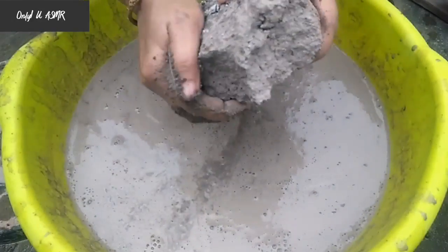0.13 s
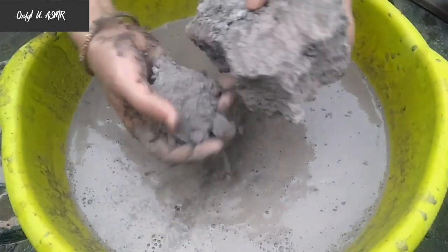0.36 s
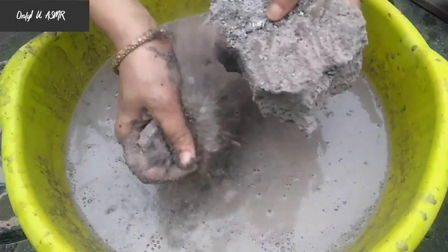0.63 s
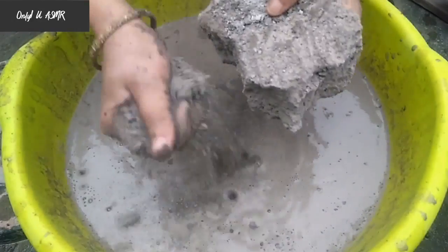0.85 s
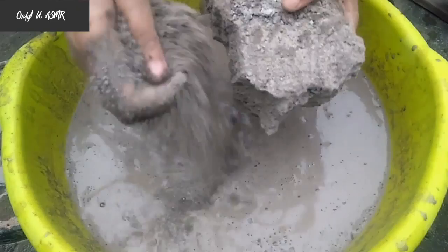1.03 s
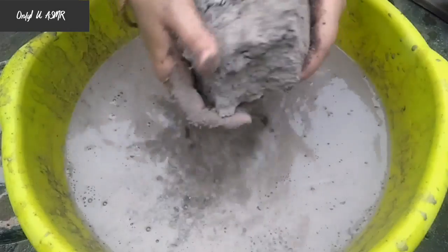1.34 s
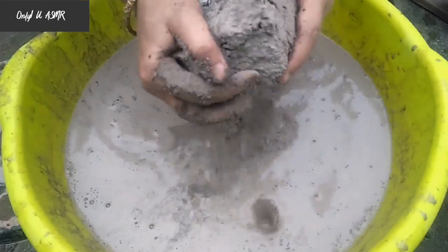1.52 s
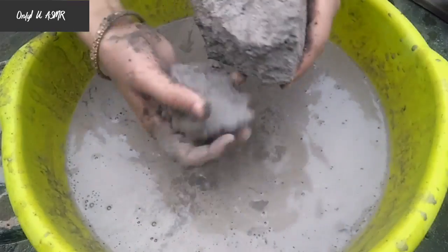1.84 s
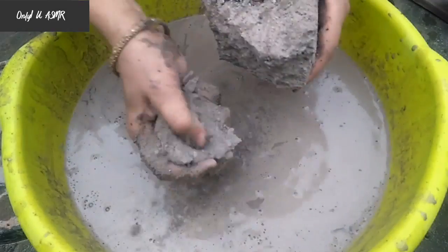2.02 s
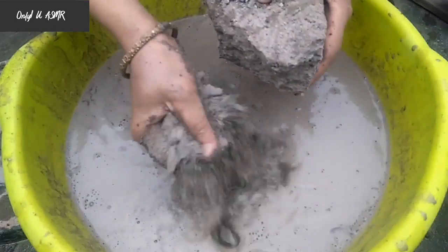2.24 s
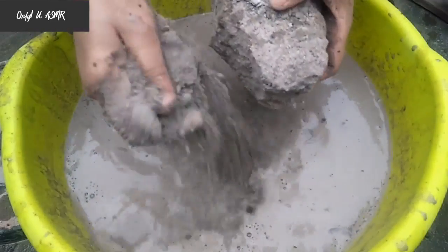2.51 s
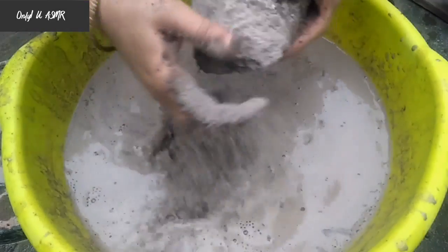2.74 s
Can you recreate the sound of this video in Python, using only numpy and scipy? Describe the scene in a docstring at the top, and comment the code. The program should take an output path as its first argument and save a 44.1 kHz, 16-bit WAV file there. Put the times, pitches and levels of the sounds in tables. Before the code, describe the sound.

Sandy lumps crumble into a plastic tub of water, heard close, outdoors. Low uneven rumble and a very faint far tone open; soft crunches and small plops come by 0.5 s. Plops, tub knocks and grit patter cluster at 0.9-1.5 s, with the loudest hollow plop at 1.55. After a quiet lull with light crunches and tiny bubble tones, a bright plop snaps at 2.44, then a splashy cluster at 2.82.

```python
"""A low, uneven town rumble under faint broad noise is heard first, out of doors; a faint far tone,
perhaps a horn, soon sounds as a gliding sine. Hands crumble a lump of gritty sand over a plastic tub of
muddy water: coloured random ticks make the crunches and the patter of grit. Crumbs plop and drip as
decaying resonances, some knocking the tub, dry grains snap as short bright noise bursts, and trapped
air rings as gliding sines."""
import sys
import numpy as np
from scipy import signal
from scipy.fft import rfft, irfft, next_fast_len
from scipy.io import wavfile

SR = 44100
rng = np.random.default_rng(int(sys.argv[2]) if len(sys.argv) > 2 else 0)


def to_wav(s):
    """Save 16-bit WAV."""
    ch = np.atleast_2d(s).T  # columns
    pcm = np.round(np.clip(ch, -1, 1) * 32767)  # PCM
    wavfile.write(sys.argv[1], SR, pcm.astype(np.int16))


N = 127008  # samples


def amp(db):
    """Decibel law: a level as an amplitude ratio."""
    return 10 ** (np.asarray(db) / 20)


def rms_one(x):
    """Normalisation to unit root-mean-square."""
    return x / np.sqrt(np.mean(x ** 2) + 1e-20)


def in_time(rows):
    """Linear interpolation of each column over the whole time axis."""
    s, *columns = np.transpose(rows)
    return [np.interp(np.arange(N) / SR, s, column) for column in columns]


def low_pass(x, hz):
    """Second-order Butterworth low-pass filtering."""
    return signal.sosfilt(signal.butter(2, hz, fs=SR, output="sos"), x)


def resonance(x, hz, width_hz):
    """Damped resonance: a two-pole filter whose bandwidth sets its decay."""
    r = np.exp(-np.pi * width_hz / SR)
    zeros = [(1 - r * r) / 2, 0, (r * r - 1) / 2]
    poles = [1, -2 * r * np.cos(2 * np.pi * hz / SR), r * r]
    return signal.lfilter(zeros, poles, x + 1e-18)


def colour(x, points):
    """Minimum-phase filtering: a drawn spectrum is imposed and nothing sounds early."""
    hz, db = np.transpose(points)
    size = next_fast_len(N + 4096)
    bins = np.fft.rfftfreq(size, 1 / SR) + 1
    log_magnitude = np.interp(np.log(bins), np.log(hz), db) * np.log(10) / 20
    # Folding the cepstrum onto positive times gives the minimum phase.
    cepstrum = irfft(log_magnitude, size)
    cepstrum[1:size // 2] *= 2
    cepstrum[size // 2 + 1:] = 0
    return irfft(rfft(x, size) * np.exp(rfft(cepstrum)), size)[:N]


def drift(rate_hz):
    """Twice low-passed noise: slow random variation of unit rms."""
    r = np.exp(-2 * np.pi * rate_hz / SR)
    settled = signal.lfilter([1], [1, -2 * r, r * r], rng.standard_normal(N + SR))[SR:]
    return rms_one(settled)


def hump(start, length):
    """Amplitude envelope: one soft rise and fall, the square root of a half sine."""
    progress = np.clip((np.arange(N) / SR - start) / length, 0, 1)
    return np.sqrt(np.sin(np.pi * progress))


def grains(rate, spread_db, points):
    """Random impulse process: uneven ticks of either sign, scaled to unit rms once coloured."""
    sizes = amp(spread_db * np.minimum(rng.exponential(1, N), 5)) * rng.choice([-1, 1], N)
    ticks = sizes * (rng.random(N) < rate / SR)
    return ticks / np.std(colour(ticks, points))


# The lump crunches, or a shower of grit lands: [t/s, length/s, level/dB]
CRUNCHES = [(0.126, 0.046, -62), (0.333, 0.021, -50.5), (0.374, 0.024, -51.5), (0.649, 0.029, -51),
            (0.689, 0.026, -53), (0.78, 0.029, -48.5), (1.027, 0.013, -42), (1.072, 0.0064, -42),
            (1.2035, 0.0051, -44), (1.22, 0.026, -51), (1.261, 0.05, -45.5), (1.356, 0.0098, -53),
            (1.411, 0.0063, -52), (1.718, 0.0063, -47), (1.811, 0.03, -53.5), (2.101, 0.013, -47.5),
            (2.197, 0.026, -47.5), (2.29, 0.01, -46), (2.365, 0.021, -50), (2.549, 0.032, -52.5),
            (2.678, 0.047, -51), (2.82, 0.012, -41), (2.844, 0.01, -45)]
# Spectrum of a grain tick, also used by grit(): [f/Hz, level/dB per Hz]
GRAIN_COLOUR = [(760, -48.5), (1300, -4.5), (2430, 4.5), (3730, 0.5), (4530, 1.5), (6890, -2.5), (9560, 1),
                (15000, -17)]
CRUNCH_TICKS_PER_S, CRUNCH_SPREAD_DB = 3500, 3.0
CRUNCH_TAIL_S = 0.0019  # time constant


def crunches():
    """Gated granular noise: short dense runs of ticks, each with a small exponential tail."""
    r = np.exp(-1 / (CRUNCH_TAIL_S * SR))
    t = np.arange(N) / SR
    gate = np.zeros(N)
    for s, length, db in CRUNCHES:
        gate += amp(db) * np.clip((t - s) / .002, 0, 1) * (t < s + length)  # 2 ms onset
    gate = np.maximum(gate, signal.lfilter([1 - r], [1, -r], gate))
    ticks = grains(CRUNCH_TICKS_PER_S, CRUNCH_SPREAD_DB, GRAIN_COLOUR)
    return colour(gate * ticks, GRAIN_COLOUR)


# Crumbs plop into the water: [t/s, peak level of the tone/dB, f/Hz, cycles to ring down 60 dB]
PLOPS = [(0.3814, -39, 2237, 120), (0.475, -30.5, 2030, 9.6), (0.8674, -43, 1300, 51),
         (0.9459, -21.5, 705, 14.4), (.9490, -24.5, 1010, 10.3), (0.968, -30.5, 2100, 18),
         (0.9800, -29.5, 1320, 20), (.9815, -25.5, 2600, 5.4), (1.0162, -28.5, 3090, 20),
         (1.0274, -34.5, 1233, 52), (1.0757, -32, 1610, 12.6), (1.1134, -36.5, 2930, 10),
         (1.267, -32, 1930, 11), (1.294, -37, 2050, 17), (1.311, -30.5, 2340, 16),
         (1.362, -36.5, 3320, 12.0), (1.4066, -47, 1840, 21), (1.447, -43, 910, 24),
         (1.479, -32.5, 2660, 5.7), (1.526, -35.5, 880, 20), (1.5308, -33, 1950, 14),
         (1.5528, -6.5, 1290, 10.7), (1.6052, -33, 2170, 16), (2.2412, -42.5, 2200, 39),
         (2.376, -32.5, 2100, 4.4), (2.4392, -18.5, 2730, 15.3), (2.4837, -35.5, 2580, 7.8),
         (2.5505, -35, 1720, 11), (2.558, -32, 1424, 16), (2.6109, -40, 593, 6.2),
         (2.7023, -34.5, 2620, 11), (2.8195, -23, 2130, 4.6), (2.824, -25, 1310, 21),
         (2.832, -28, 925, 5.9), (2.854, -33, 2310, 5.5)]
# Modes of the tub: [f/Hz, gain on the knock/dB, 60 dB decay time/s]
TUB_MODES = [(664, 3.5, 0.011), (1313, -10, 0.04), (2823, 2.5, 0.0043), (4314, -19.5, 0.048)]
PITCH_RISE_PER_CYCLE = 0.0015  # share of the starting pitch
ATTACK_CYCLES = 2.76  # time constant of the swell
FLUTTER = .33  # rms share by which the cavity's ring flutters
SPRAY_DB, SPRAY_DECAY_S, SPRAY_TOP_HZ = -16, 0.0033, 4400  # level relative to the plop, before decay
KNOCK_DB_PER_OCTAVE = -5  # small, high crumbs hardly knock the tub


def plops():
    """Cavity resonance: each crumb's ring rises in pitch, throws spray and knocks the tub's modes."""
    t = np.arange(SR // 10) / SR
    out, knocks = np.zeros(N + SR), np.zeros(N + SR)
    noises = low_pass(rng.standard_normal((len(PLOPS), len(t))), SPRAY_TOP_HZ)
    for (s, db, hz, ring_cycles), noise in zip(PLOPS, noises):
        c = hz * t  # cycles at the starting pitch
        swell_and_decay = (1 - np.exp(-c / ATTACK_CYCLES)) * amp(-60 * c / ring_cycles)
        tone = swell_and_decay * np.sin(2 * np.pi * c * (1 + PITCH_RISE_PER_CYCLE / 2 * c))
        tone = tone * (1 + FLUTTER * rms_one(low_pass(noise, hz / 4)))
        spray = amp(SPRAY_DB) * rms_one(np.diff(noise, prepend=0))
        spray = spray * np.exp(-t / SPRAY_DECAY_S) * (1 - np.exp(-c))
        knock = amp(db + KNOCK_DB_PER_OCTAVE * np.log2(hz / 1000)) * c * np.exp(-c * 12) * 20
        i = int(s * SR)
        out[i:i + len(t)] += amp(db) * (tone / np.abs(tone).max() + spray)
        knocks[i:i + len(t)] += knock
    for hz, db, t60 in TUB_MODES:
        width = np.log(1000) / np.pi / t60
        out -= amp(db) * resonance(knocks, hz, width) * hz / width
    return out[:N]


# Falling grit, also drives drips(): [t/s, level/dB]
POUR = [(0, -67.5), (.3, -65), (.85, -57), (1.0, -49.5), (1.15, -56.5), (1.4, -51), (1.62, -55),
        (1.78, -66), (2.05, -64), (2.25, -56), (2.65, -56), (2.88, -53)]
GRIT_PER_S, GRIT_SPREAD_DB, GRIT_CLUMP_DB = 5000, 1, 2.0  # clumping is the rms swing of the level


def grit():
    """Modulated granular noise: loose grains patter on the water in clumps."""
    db, = in_time(POUR)
    clumped = amp(db + GRIT_CLUMP_DB * drift(18))
    return colour(clumped * grains(GRIT_PER_S, GRIT_SPREAD_DB, GRAIN_COLOUR), GRAIN_COLOUR)


DRIPS_PER_S, DRIP_SPREAD_DB = 700, 3.5  # rate at full pour, before the flurries vary it
DRIP_DB = -9  # impulse level relative to the pour, before the spread
DRIP_LOW_HZ, DRIP_HIGH_HZ, DRIP_PITCHES = 1900, 6000, 14
DRIP_CYCLES = 11  # cycles for the narrow resonance to fall 60 dB


def drips():
    """Impulse-excited resonance: small crumbs land in random flurries and ring a few cycles each."""
    db, = in_time(POUR)
    sizes = amp(db + DRIP_DB + DRIP_SPREAD_DB * np.minimum(rng.exponential(1, N), 3))
    rate = DRIPS_PER_S * amp(db - db.max() + 4.0 * drift(8))
    impacts = sizes * (rng.random(N) < rate / SR)
    dealt = rng.integers(0, DRIP_PITCHES, N)
    pitches = np.geomspace(DRIP_LOW_HZ, DRIP_HIGH_HZ, DRIP_PITCHES)
    out = np.zeros(N)
    for k, hz in enumerate(pitches):
        width = np.log(1000) / np.pi * hz / DRIP_CYCLES
        ring = resonance(impacts * (dealt == k), hz, width)
        out += resonance(ring, hz, hz / 2) * SR / width  # the second, broad pass softens the onset
    return out


# Dry grains snap brightly: [t/s, noise level before decay and high-pass/dB]
SNAPS = [(1.001, -29.5), (1.531, -27), (1.934, -35), (1.951, -37.5), (2.4401, -23.5)]
SNAP_DECAY_S, SNAP_BOTTOM_HZ = 0.00058, 5000


def snaps():
    """Exponentially decaying noise, high-passed: very short bright bursts."""
    t = np.arange(SR // 50) / SR
    out = np.zeros(N + SR)
    noises = rng.standard_normal((len(SNAPS), len(t)))
    for (s, db), noise in zip(SNAPS, noises):
        i = int(s * SR)
        out[i:i + len(t)] += amp(db) * noise * np.exp(-t / SNAP_DECAY_S)
    high_pass = signal.butter(2, SNAP_BOTTOM_HZ, "high", fs=SR, output="sos")
    return signal.sosfilt(high_pass, out[:N])


TAIL_DB, TAIL_T60_S, TAIL_TOP_HZ = -16, .05, 4000


def tub_space(x):
    """Diffuse reverberation: convolution with a short, dull, decaying noise tail."""
    t = np.arange(SR // 8) / SR
    tail = low_pass(rng.standard_normal(len(t)), TAIL_TOP_HZ)
    tail = tail * amp(-60 * t / TAIL_T60_S) * (t > .002)  # begins after 2 ms
    tail = tail / np.sqrt(np.sum(tail ** 2))
    return x + amp(TAIL_DB) * signal.fftconvolve(x, tail)[:N]


# Trapped air rings; the first row is a faint far tone, perhaps a horn: [t/s, length/s, f/Hz, level/dB]
GLIDING_TONES = [(0.041, 0.047, 588, -51), (0.149, 0.037, 411, -50.5), (0.45, 0.04, 300, -44.5),
                 (0.534, 0.036, 256.5, -42.5), (0.871, 0.071, 717, -50), (1.028, .13, 397.6, -51.5),
                 (2.053, 0.02, 602, -49), (2.101, .025, 588, -54), (2.14, 0.024, 594, -49),
                 (2.197, 0.019, 560, -47.5), (2.248, 0.055, 617, -54.5), (2.552, 0.025, 583, -47)]
GLIDE_PER_S = .8  # share of the starting pitch gained per second


def bubbles_and_far_tone():
    """Frequency glide: near sines rise a little, as ringing trapped air and first one faint far tone."""
    out = np.zeros(N)
    for s, length, hz, db in GLIDING_TONES:
        age = np.arange(N) / SR - s
        cycles = hz * (1 + GLIDE_PER_S / 2 * age) * age
        out += amp(db) * np.sqrt(2) * hump(s, length) * np.sin(2 * np.pi * cycles)
    return out


# Resonances of the lower and upper rumble bands: [f/Hz, width/Hz, level/dB]
BOOM_MODES = [(56.6, 24.2, 0)]
DRONE_MODES = [(106.6, 17, 0.5), (132, 19.8, -1.5)]
# Swelling of each band: [t/s, level/dB]
BOOM_LEVEL = [(0, -43.5), (.1, -38), (.72, -40), (.8, -33.5), (.95, -44.5), (1.12, -31), (1.3, -39),
              (1.38, -28), (1.45, -38.5), (1.67, -29.5), (1.76, -43.5), (1.81, -31.5), (1.96, -38),
              (2.02, -37.5), (2.34, -26.5), (2.43, -28.5), (2.62, -39), (2.82, -28), (2.88, -32)]
DRONE_LEVEL = [(0, -38.5), (.3, -37), (.47, -39.5), (.55, -31.5), (.72, -45), (1.4, -41.5), (1.56, -36),
               (2.1, -51), (2.4, -37), (2.88, -60)]
RUMBLE_EVENNESS = 0.21  # exponent that partly flattens the noise's own lumps


def rumble():
    """Resonant filtering of noise: two low bands, resonated twice, swell unevenly."""
    out = np.zeros(N)
    for level, modes in ((BOOM_LEVEL, BOOM_MODES), (DRONE_LEVEL, DRONE_MODES)):
        white = rng.standard_normal(N)
        band = np.zeros(N)
        for hz, width, db in modes:
            band += amp(db) * resonance(resonance(white, hz, width), hz, width)
        band = rms_one(band)
        lumps = np.abs(signal.hilbert(band, next_fast_len(N))[:N]) + 0.23
        out += amp(in_time(level)[0]) * rms_one(band / lumps ** RUMBLE_EVENNESS)
    return out


# Spectrum of the distant surroundings: [f/Hz, level/dB per Hz]
AIR_COLOUR = [(25, -23), (40, -6.5), (160, -3.5), (260, -6.5), (420, -15), (600, -15), (900, -20.5),
              (1350, -34), (2600, -51), (6000, -86), (9000, -37.5), (12000, -53), (16000, -51)]
# Faint far tones: [t/s, length/s, f/Hz, level/dB]
FAR_TONES = [(-.03, 0.17, 1765, -67), (0.1, 0.13, 2480, -71), (0.095, 0.15, 3080, -71),
             (0.305, 0.1, 3200, -66)]
AIR_DB, AIR_PATCHY_DB = -47.5, 1.5  # level before the swelling, and the swelling's rms
TONE_WIDTH_HZ = 90  # of each resonance pass


def surroundings():
    """Band-split modulation: far noise swells apart in lows and highs, with narrow-band tones in it."""
    far = rms_one(colour(rng.standard_normal(N), AIR_COLOUR))
    lows = low_pass(far, 436)
    highs = far - lows
    out = amp(AIR_PATCHY_DB * drift(4.0)) * lows + amp(AIR_PATCHY_DB * drift(23)) * highs
    out = amp(AIR_DB) * out
    for s, length, hz, db in FAR_TONES:
        tone = resonance(rng.standard_normal(N), hz, TONE_WIDTH_HZ)
        tone = resonance(tone, hz, TONE_WIDTH_HZ)
        out += amp(db) * hump(s, length) * rms_one(tone)
    return out


def scene():
    """Superposition of all sources; plops, drips and snaps pass through the tub's reflections."""
    in_tub = tub_space(plops() + drips() + snaps())
    mix = crunches() + in_tub + grit() + bubbles_and_far_tone() + rumble() + surroundings()
    return mix[None, :]


def record(dry):
    """Band limitation: a steep low-pass, 60 dB down from 16850 Hz upward, cuts the top."""
    return signal.sosfilt(signal.cheby2(12, 60, 16850, fs=SR, output="sos"), dry)


dry = scene()
out = record(dry)
to_wav(out)
```